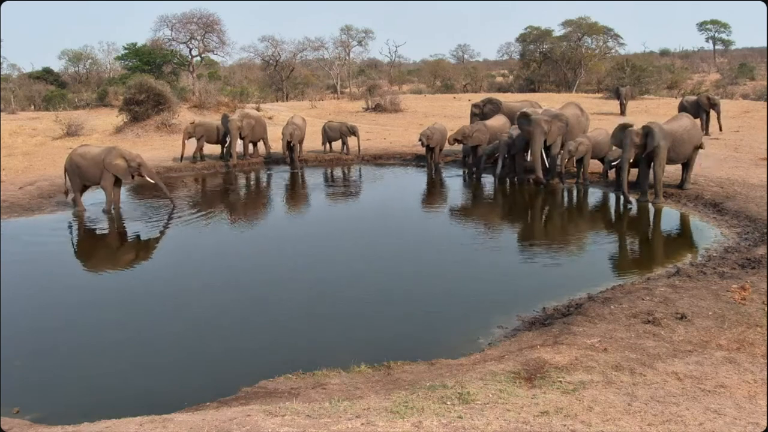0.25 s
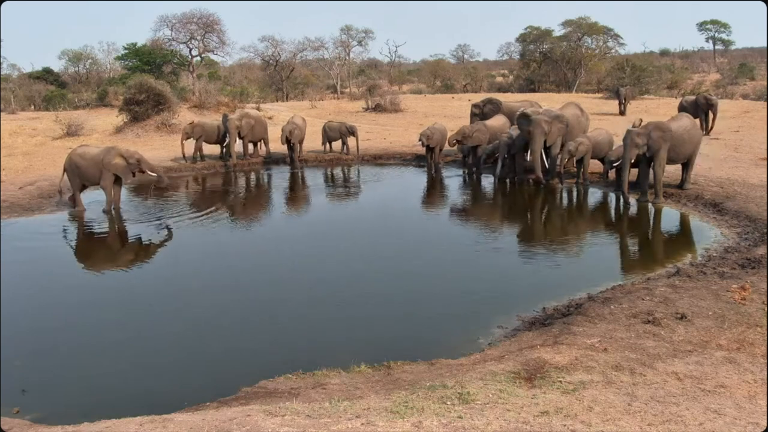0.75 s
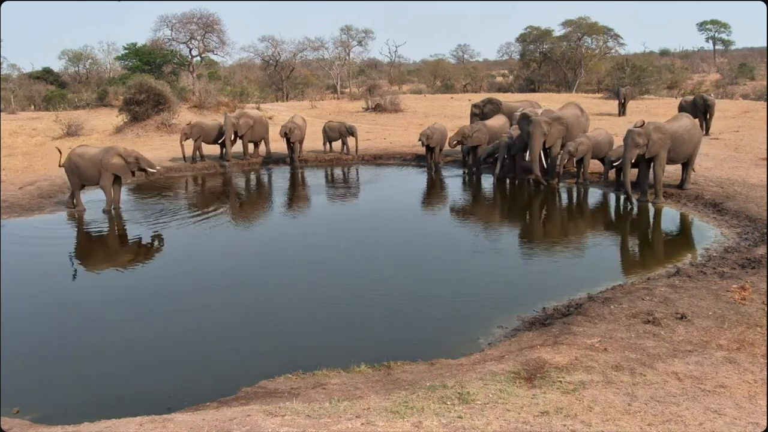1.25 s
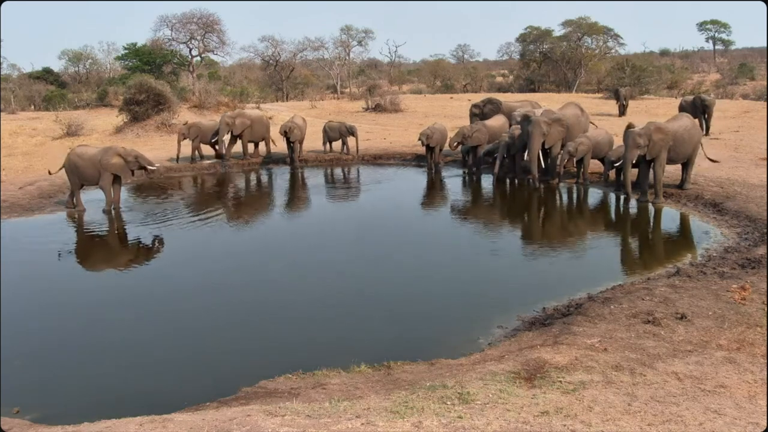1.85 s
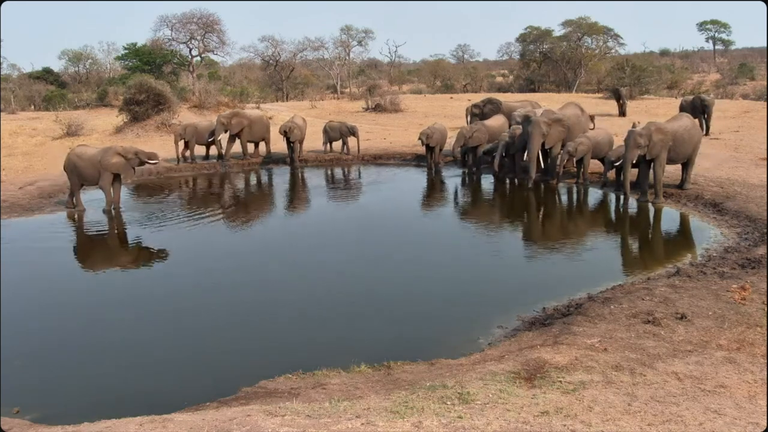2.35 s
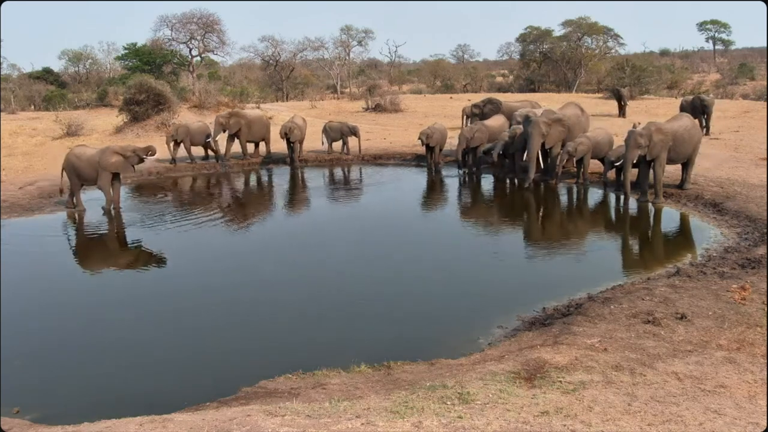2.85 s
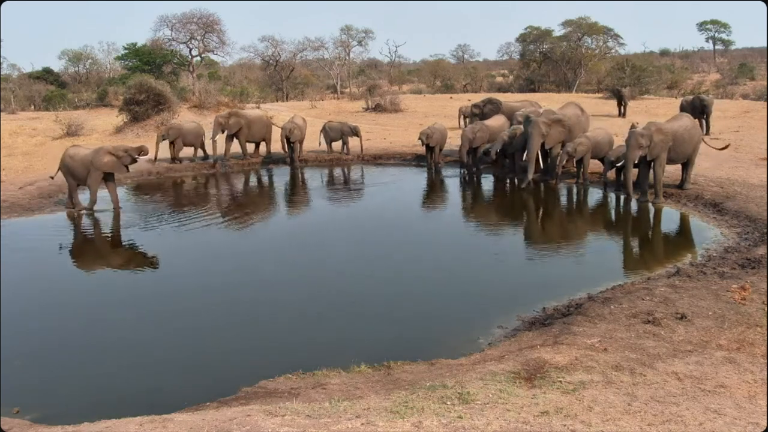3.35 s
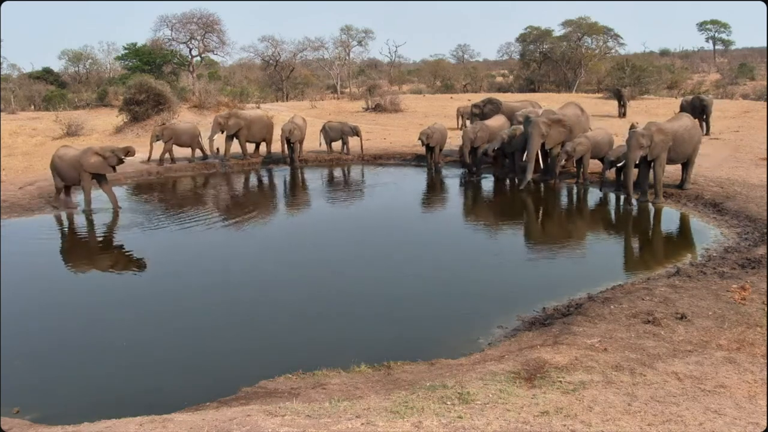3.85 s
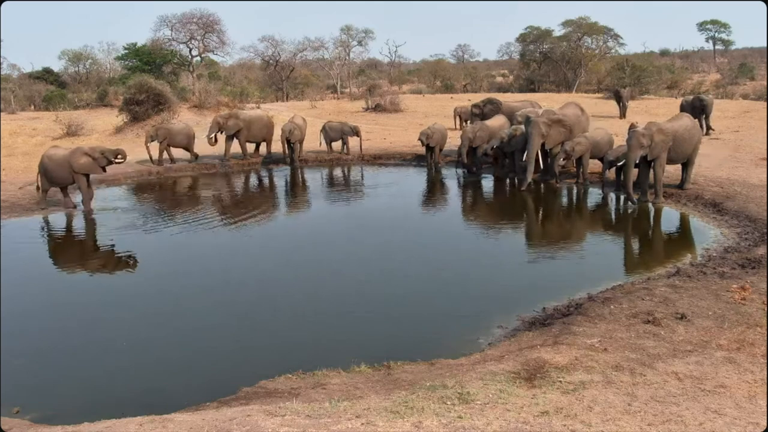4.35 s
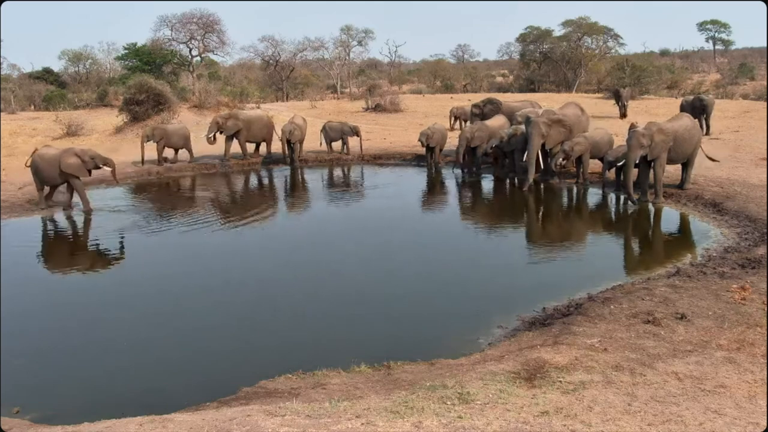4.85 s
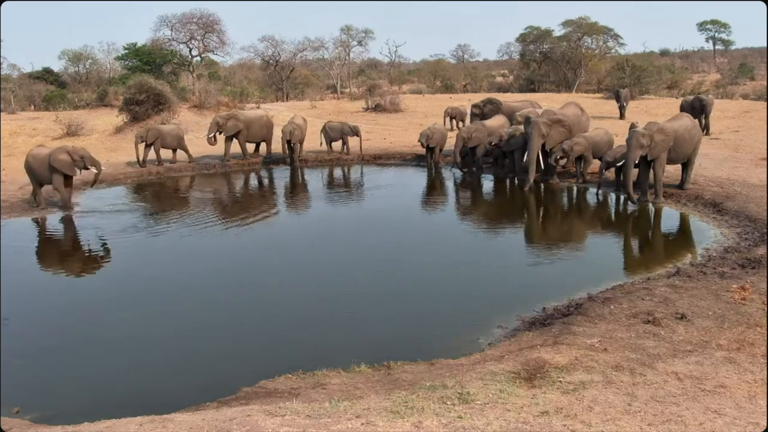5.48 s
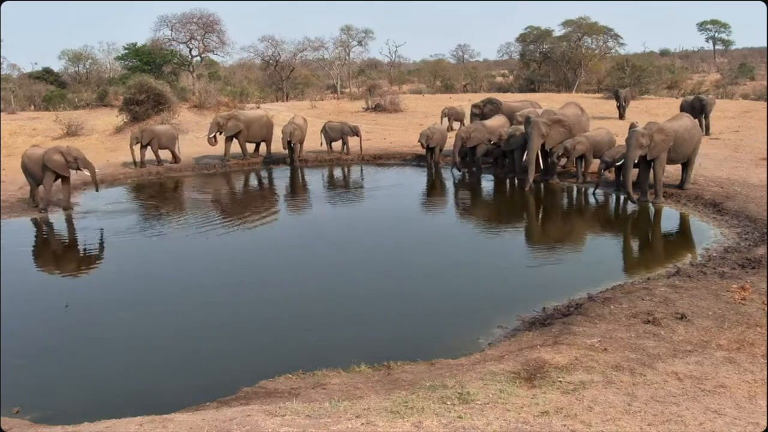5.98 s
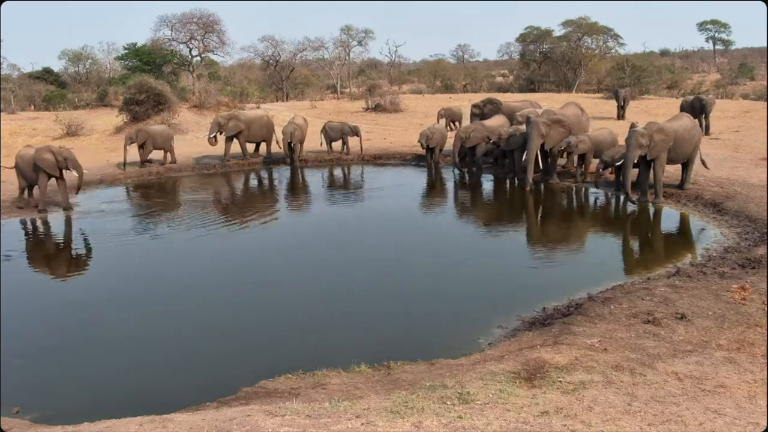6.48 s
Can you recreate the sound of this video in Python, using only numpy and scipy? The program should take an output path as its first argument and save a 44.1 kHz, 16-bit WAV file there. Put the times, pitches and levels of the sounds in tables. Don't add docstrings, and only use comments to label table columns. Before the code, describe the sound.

Light splashes and scattered glassy drops open over a soft trickle, with bubbles plopping in a stirred pool. A thicker gush of trunk water peaks early, with a faint blown breath; a sharp splash and hollow gulps follow midway. Later a bird gives a clear descending four-note whistle as the dripping fades. Open air, dry close echoes off water and bank, small bright microphone with slight hiss.

```python
import sys
import numpy as np
from scipy import signal
from scipy.fft import rfft, irfft, next_fast_len
from scipy.io import wavfile
from scipy.ndimage import uniform_filter1d, map_coordinates

SR = 44100
rng = np.random.default_rng(int(sys.argv[2]) if len(sys.argv) > 2 else 0)


def elevation(decibels):
    levels = np.asarray(decibels, float)
    return 10 ** (levels / 20)


def persist_wave(psi):
    counts = np.round(np.clip(psi, -1, 1) * 32767).astype(np.int16)
    wavfile.write(sys.argv[1], SR, np.atleast_2d(counts).T)


N = 296352

# hz, gain_db
HISS_TONE = [(15, -72), (25, -14), (147, -20.5), (301, -26), (781, -26), (1100, -22.5), (1560, -6.5),
             (1870, -19), (2380, -16.5), (2860, -14.5), (3440, -10.5), (8240, -20.5), (12900, -16),
             (14000, -29)]
# hz, level_db
MAINS_HUM = [
    (50, -86.5),
    (150.5, -85),
]
# start_s, flow_db
POUR = [(0, -55), (1.14, -57.5), (1.55, -45.5), (1.86, -52.5), (1.95, -44.5), (2.04, -44), (2.15, -39),
        (2.3, -38), (2.45, -44), (2.62, -55.5), (2.79, -57.5), (3.8, -57.5), (4.7, -59), (5.13, -56),
        (5.46, -57.5), (5.93, -66), (6.4, -68.5), (6.72, -60)]
# peak_s, spray_db, rise_20db_s, fall_20db_s, brightness_db
SPLASHES = [(0, -41, .1, 0.56, -1), (.6, -53, 0.1, 0.4, 3), (.92, -50, 0.2, .35, -1),
            (2.132, -47, 0, 0.03, 7), (2.866, -41, 0.07, 0.36, 4), (2.94, -38.5, 0.3, 0.23, -11),
            (3.83, -35, 0.0268, 0.2952, -1), (3.9, -41.5, 0.04, 0.26, -2.5), (4.13, -50, .25, 0.4, -7),
            (5.15, -58.5, 0.27, .5, 7), (1.66, -51.5, 0.1, 0.34, 2), (3.45, -61, 0.8, 0, 6),
            (5.6, -52.5, 0.26, .25, -5.5), (5.95, -67, -0.1, .4, 7), (6.27, -59.5, 0.15, .2, -12)]
# hz, gain_db
SPRAY_TONE = [(1060, -30), (1800, -16.5), (2280, -15.5), (2870, -11), (3290, -5.5), (3410, -2.5),
              (5270, -19), (5960, -25), (6500, -61.5), (8450, -31.5), (14300, -120)]
# hz, gain_db
FIZZ_TONE = [(3240, -32.5), (5500, 25), (5970, -2), (9730, -17.5), (12800, -26), (14000, -24.5)]
# hz, gain_db
JET_TONE = [(2500, -39.5), (3150, -2), (3450, -2.5), (3800, -12.5), (4500, -39)]
# start_s, level_db
LAPPING = [(0, -61.5), (2.6, -66.5), (4.8, -70), (5.3, -75), (6.2, -72), (6.72, -70)]
# peak_s, slosh_db, rise_20db_s, fall_20db_s, bubble_hz
STIRS = [(0, -56, .1, 0.5, 1200), (.24, -57.5, .2, 0.15, 794), (.79, -49, 0.52, 0.15, 721),
         (1.0, -59, .2, .5, 760), (1.41, -56, 0.76, 1.0, 1000), (1.96, -46, 0.1, .5, 1257),
         (2.11, -45, 0.07, 0.5, 926), (2.36, -45, 0.64, 0.4, 1000), (2.88, -55, .05, 0.35, 803),
         (2.97, -56, 0.26, 0.28, 1104), (3.41, -53, 0.32, 0.25, 827), (3.5, -54.5, 0.01, 0.2, 697),
         (3.72, -56, -0.1, .2, 900), (3.83, -42.5, 0.16, 0.43, 821), (3.96, -44, 0.34, 0.17, 725),
         (4.18, -56, .2, -2, 900), (4.382, -45.5, 0.06, .5, 780), (4.57, -58, 0.75, 0.43, 777),
         (4.67, -57.5, 0.4, .12, 800), (4.92, -54, -0.05, 0.39, 1148), (5.52, -55, .06, 0.41, 950),
         (5.63, -55, .25, 0.26, 1090), (6.3, -60.5, 0.26, 0.55, 1000), (6.56, -62.5, .05, 0.3, 960)]
# hz, gain_db
SLOSH_TONE = [(120, -75), (200, -27.5), (604, -7.5), (990, -10), (1080, -12.5), (1310, -6.5), (1490, -6),
              (2170, -15.5), (2600, -12), (3380, -40), (5720, -120)]
# start_s, peak_db, pitch_hz
GULPS = [(.03, -36, 1640), (1.2, -34, 2270), (.592, -31.5, 992), (.781, -36, 438), (.903, -42, 1760),
         (.905, -36, 2450), (.92, -33, 2600), (1.155, -36.5, 1610), (1.222, -38.5, 1570),
         (1.312, -35.5, 1690), (1.992, -37, 1155), (2.264, -30, 900), (3.122, -40.5, 1560),
         (3.632, -37.5, 1650), (3.799, -33, 1294), (3.841, -32, 970), (3.948, -32, 661),
         (4.04, -35.5, 1730), (4.382, -31, 529), (4.428, -21.5, 1288), (4.484, -35.5, 895),
         (6.565, -44.5, 844), (5.313, -39.5, 1500), (5.515, -45, 1440), (5.894, -43, 1370),
         (6.372, -39, 1380)]
# start_s, peak_db
SNAPS = [(0.0408, -36), (0.0623, -38), (0.1835, -39), (0.2922, -41), (0.5846, -41), (0.742, -36),
         (0.7692, -30), (0.8434, -33), (0.9033, -52), (1.4671, -46), (1.516, -42.5), (1.6601, -46),
         (1.7509, -40), (1.9764, -53), (2.1317, -24), (2.7985, -37), (2.826, -27), (2.8594, -26.5),
         (2.9602, -46), (3.1507, -41), (3.4535, -36), (3.4775, -34), (3.7818, -47), (3.8282, -36),
         (3.9735, -42), (4.0861, -41.5), (4.3276, -43), (4.792, -46), (5.0255, -34), (5.263, -36)]
# start_s, peak_db, pitch_hz, snap_db
DROPS = [(0.048, -28, 4200, -30), (0.107, -27, 4530, -9), (.184, -22.5, 3860, -15),
         (0.2941, -23.5, 4080, -11.5), (0.5778, -28, 4100, -15.5), (.742, -29, 4600, -11),
         (.769, -34, 4240, -3), (0.919, -34, 3240, -10.5), (1.26, -39, 5700, -19),
         (1.5167, -26, 3180, -13.5), (1.7525, -21, 3610, -20), (2.1232, -24, 4340, -14),
         (2.1316, -16, 3680, -12), (5.4705, -37, 4400, -11), (2.2884, -17.5, 3340, -33),
         (2.826, -25, 4170, -9), (2.8456, -23.5, 4340, -11), (2.8595, -17, 4280, -11),
         (2.9613, -22, 4040, -20), (3.1508, -36.5, 5060, -3), (3.387, -33, 4630, -9.5),
         (3.4772, -33, 4440, -9.5), (3.822, -18, 3740, -10.5), (3.8346, -13.5, 3640, -13),
         (3.8929, -16, 3770, -12), (3.919, -21.5, 3550, -12), (4.0977, -19.5, 3660, -14.5),
         (4.793, -37.5, 3520, -4.5), (5.315, -29.5, 3280, -15.5), (5.9614, -38.5, 3280, -11.5),
         (6.074, -40.5, 6000, -15.5), (6.2078, -36, 4900, -11)]
# start_s, peak_db, pitch_hz
DRIPS = [(0.138, -25, 3860), (.414, -31.5, 4570), (5.1516, -30, 5300), (0.536, -35, 4250),
         (0.6668, -32, 3620), (1.157, -34.5, 3560), (1.201, -28.5, 3430), (1.2725, -31, 3930),
         (1.3328, -32, 3440), (1.5527, -25, 3290), (1.597, -26.5, 3470), (1.8445, -24, 3970),
         (1.9508, -26.5, 3120), (2.0384, -30, 3330), (2.1854, -26, 3380), (2.2573, -23, 3400),
         (2.4126, -26, 3280), (2.8783, -17.5, 3800), (3.0203, -26, 3700), (3.043, -27, 4000),
         (3.0874, -28, 3420), (4.0438, -28, 4740), (4.3287, -33.5, 3560), (4.659, -31.5, 4000),
         (4.669, -36, 3560), (5.0917, -32, 3600), (5.1907, -31, 3300), (5.4064, -35.5, 3730),
         (6.185, -38.5, 3130), (6.6527, -40, 4160),
         (0.25, -35.5, 3740), (0.2638, -33, 3590), (0.4986, -37, 3500), (0.8904, -37, 3490),
           (1.135, -36, 3800), (1.4671, -36, 3720), (1.4845, -31, 3260), (1.6496, -31.5, 3460),
           (1.9165, -35, 3380), (2.0158, -29, 3430), (2.2254, -21.5, 3300), (2.3274, -22.5, 3400),
           (2.3374, -23, 3330), (3.1604, -34, 4900), (3.2214, -38, 4570), (3.246, -38, 3310),
           (3.274, -34.5, 3650), (3.3594, -40, 3910), (3.849, -20, 3510), (3.858, -21, 3770),
           (3.8812, -18, 3550), (3.9014, -21, 3740), (4.4228, -36.5, 3560), (4.8958, -35.5, 3300),
           (4.9317, -39, 3300), (5.0379, -34, 3540), (5.438, -39, 4700), (5.6166, -42, 3460),
           (5.7488, -43, 3330), (5.8591, -43, 3400), (5.9844, -41, 3470), (6.2605, -41, 3150),
           (6.3444, -47, 3470), (6.4208, -49, 3300), (6.5665, -46, 3500)]
# delay_s, level_db
BANK_ECHOES = [(.0027, -6.5), (.0065, -9.5), (0.012, -12.5), (.021, -15.5)]
# start_s, peak_db, pitch_hz, life_cycles
PLOPS = [(0.117, -40.5, 1530, 8), (0.267, -41, 1710, 10), (0.36, -46, 2290, 8.8), (0.481, -43, 1720, 8.6),
         (0.688, -45.5, 1420, 7.4), (0.703, -41.5, 867, 8), (0.98, -45, 743, 7.5), (1.313, -38.5, 1680, 8),
         (1.572, -38.5, 1540, 7.3), (1.6, -34, 666, 8), (1.667, -35, 676, 8), (1.822, -45.5, 802, 8),
         (1.864, -47, 790, 8), (1.995, -32, 1910, 8), (2.157, -22.5, 940, 10.4), (2.717, -48, 1520, 8),
         (3.034, -43, 1860, 8), (3.087, -49, 1140, 8), (3.349, -44, 1520, 8.7), (3.504, -38.5, 1490, 9.5),
         (3.863, -34, 950, 7.6), (4.332, -47, 1520, 8), (4.372, -35, 623, 8), (4.431, -26.5, 1280, 8),
         (4.454, -33, 1330, 7.3), (4.524, -41, 850, 8), (4.549, -45, 466, 8), (4.591, -43.5, 930, 8.9),
         (4.616, -44, 1220, 8), (4.629, -43, 640, 8), (4.843, -41, 1700, 9), (4.887, -41, 1480, 8),
         (4.93, -41, 1050, 8), (4.97, -42, 1580, 8), (5.002, -42, 1280, 9.2), (5.052, -45, 1580, 8),
         (5.133, -50, 1590, 7.2), (5.252, -46, 1580, 9.3), (5.502, -40, 1480, 8), (5.596, -42, 1480, 8),
         (5.859, -54, 848, 9.1), (5.932, -52.5, 1570, 8.9), (5.962, -46, 1700, 8), (6.119, -54, 1450, 8),
         (6.164, -49, 1050, 8), (6.254, -49, 1690, 8), (6.28, -47, 1430, 7.3), (6.324, -48, 1420, 8),
         (6.453, -47, 1450, 9.8), (6.545, -45.5, 1170, 8.5)]
# start_s, peak_db, starting_hz
RISERS = [(.425, -51, 451), (.562, -52, 1550), (.625, -47, 1230), (.748, -57, 1450), (0.816, -50.5, 940),
          (.93, -61, 420), (1.098, -56, 455), (4.125, -51, 408), (4.685, -62, 455), (5.415, -63.5, 548),
          (5.722, -54.5, 765), (6.268, -61, 608), (6.318, -56, 1000), (6.686, -56.5, 1050),
          (6.396, -58.5, 627)]
# start_s, length_s, pitch_hz, level_db
HOLLOWS = [(1.13, 0.17, 620, -66.5), (1.52, 0.15, 640, -59), (1.81, 0.076, 700, -64),
           (1.935, 0.065, 632, -49.5), (2.09, 0.16, 630, -50), (2.09, 0.073, 915, -43.5),
           (2.15, 0.062, 895, -43), (2.165, 0.043, 285, -56), (2.295, .1, 278, -57),
           (2.88, 0.086, 560, -59), (3.12, 0.042, 620, -58), (2.45, .05, 280, -63), (.765, 0.054, 420, -46),
           (.76, 0.065, 900, -56.5), (4.46, .17, 480, -63), (4.41, .07, 1300, -50.5),
           (6.33, 0.063, 1450, -60), (6.35, .07, 710, -66)]
# start_s, peak_db
SLAPS = [
    (0.769, -69),
    (2.13, -53.5),
    (3.829, -65),
    (3.908, -59),
]
# start_s, level_db
BLOW = [
    (1.93, -86),
    (2.14, -64),
    (2.185, -53),
    (2.25, -68),
    (2.335, -56.5),
    (2.41, -66.5),
    (2.47, -67),
    (2.53, -87),
]
# hz, width_hz, level_db
TRUNK_MODES = [
    (294, 21, -4),
    (672, 13, -7),
    (900, 80, -2),
    (1170, 81, -4),
]
# start_s, starting_hz, level_db, hold_s, swell_db over the hold
NOTES = [
    (3.7, 3380, -57, 0.054, -4),
    (3.835, 3070, -49, .027, 3),
    (3.936, 3040, -52, 0.039, -2),
    (4.07, 2850, -60, .022, -4),
    (5.116, 3390, -32, .034, 4.5),
    (5.242, 3120, -28, .023, -11.5),
    (5.349, 2996, -43, 0.023, 4.5),
    (5.463, 2960, -56, .024, 6),
]


def unit(x):
    return x / np.sqrt(np.mean(x ** 2) + 1e-20)


def curves(rows, **ends):
    s, *cols = np.transpose(rows)
    return [np.interp(np.arange(N) / SR, s, c, **ends) for c in cols]


def wobble(rate_hz):
    knots = rng.standard_normal(int(N * rate_hz / SR) + 4)
    return map_coordinates(knots, [np.arange(N) * rate_hz / SR])


def filtered(x, response):
    size = next_fast_len(N + SR // 2)
    return irfft(rfft(x, size) * response(np.fft.rfftfreq(size, 1 / SR)), size)[:N]


def coloured(x, spectrum):
    f, db = np.transpose(spectrum)
    hz = np.fft.rfftfreq(8192, 1 / SR)
    gain_db = np.interp(np.log(hz + 1), np.log(f + 1), db)
    cepstrum = irfft(np.log(elevation(np.clip(gain_db, -70, 0))))
    cepstrum[1:4096] *= 2
    cepstrum[4097:] = 0
    return unit(signal.fftconvolve(x, irfft(np.exp(rfft(cepstrum))))[:N])


def spatter(share, size_db, clump_db, hiss):
    clumps = elevation(clump_db * (wobble(20) + wobble(70)))
    size = elevation(size_db * np.minimum(rng.exponential(size=N), 4))
    hits = (rng.random(N) < share * clumps) * np.sign(rng.standard_normal(N)) * size
    return unit(hits) + hiss * rng.standard_normal(N)


def bubbles(s, db, hz, cycles, rise, attack, size):
    k = np.arange(size)
    cycles = np.maximum(cycles, 1)[:, None]
    age = k / SR * hz[:, None] / cycles
    swell = elevation(-26 * age) * (1 - np.exp(-(age / attack) ** 2))
    swell *= np.hanning(2 * size)[size:] ** .5 / swell.max(axis=1, keepdims=True)
    wave = elevation(db[:, None]) * swell * np.sin(2 * np.pi * cycles * (age + rise * age ** 2 / 2))
    at = np.round(s * SR).astype(int)[:, None] + k
    return np.bincount(at.ravel(), wave.ravel(), N + SR)[:N]


def crowd(count, centre_hz, spread, cycles, rise, attack, size_db, size):
    s, strength, life = rng.random((count, 3)).T
    scatter = np.exp(spread * np.clip(rng.standard_normal(count), -2, 2))
    hz = centre_hz[(s * (N - 1)).astype(int)] * scatter
    level_db = -size_db * np.log(strength + 0.029) + 10 * np.log10(hz)
    return unit(bubbles(s * N / SR, level_db, hz, cycles * (.5 + life), rise, attack, size))


def swells(rows, base_db, base_value):
    s, db, rise, fall, value = np.transpose(rows)[:, :, None]
    t = np.arange(0, N, 32) / SR
    before = (s - t) / np.maximum(rise, .01)
    after = (t - s) / np.maximum(fall, .02)
    power = elevation(2 * (db - 20 * np.where(t < s, before, after)))
    power, mix = (np.interp(np.arange(N) / SR, t, p.sum(axis=0)) for p in (power, power * value))
    total = power + elevation(2 * base_db)
    return 10 * np.log10(total), (mix + elevation(2 * base_db) * base_value) / total


def patchy(depth_db, top_hz):
    hz, _, z = signal.stft(rng.standard_normal(N), SR, nperseg=512)
    field = uniform_filter1d(rng.standard_normal(z.shape), size=5, axis=0)
    field = np.clip(unit(uniform_filter1d(field, size=9, axis=1)), -2, 1)
    hz = hz[:, None]
    gain_db = depth_db * field * (hz > 300) / (1 + (hz / top_hz) ** 2)
    return signal.istft(z * elevation(gain_db), SR, nperseg=512)[1][:N]


def floor():
    hiss = elevation(-62.5 + 0.85 * wobble(8.1)) * coloured(patchy(depth_db=8.5, top_hz=5140), HISS_TONE)
    murmur_tone = [(28, -27), (50, 2), (80, 4), (150, -4.5), (330, 9), (500, -9.5), (900, -63)]  # Hz, dB
    murmur = elevation(-79.5 + 1.3 * wobble(4.8)) * coloured(rng.standard_normal(N), murmur_tone)
    t = np.arange(N) / SR
    hum = sum(elevation(db + 1.5 + 0.42 * wobble(1.9)) * np.sin(2 * np.pi * hz * t) for hz, db in MAINS_HUM)
    return hiss + murmur + hum


def falling_water():
    trickle_db, trickle_bright_db = -56, -3.5
    dulling = 0.51
    flow_db, = curves(POUR)
    treble = elevation(2 * (trickle_bright_db - dulling * np.maximum(flow_db - trickle_db, 0)))
    splashes = [(*row[:4], elevation(2 * row[4])) for row in SPLASHES]
    level_db, share = swells(splashes, flow_db, treble)
    return level_db, 10 * np.log10(share)


def spray(level_db, bright_db):
    fizz = crowd(count=4000, centre_hz=np.full(N, 4200.), spread=0.295, cycles=13.5, rise=0.095,
                 attack=0.25, size_db=3.5, size=150)
    ticks = spatter(share=.03, size_db=4.0, clump_db=3.5, hiss=0.68)
    droplets = coloured(ticks, SPRAY_TONE) + 0.82 * coloured(fizz, SPRAY_TONE)
    droplets = elevation(2.13 * wobble(11)) * droplets
    fine = spatter(share=0.022, size_db=7.5, clump_db=6.0, hiss=0.63)
    thick = np.clip(-.07 * bright_db - .1, 0, .95)
    stream = rng.standard_normal(N) + 0.45 * ticks
    body = np.sqrt(1 - thick) * droplets + 0.93 * np.sqrt(thick) * coloured(stream, SPRAY_TONE)
    jet = elevation(-.8 * bright_db - 11) * coloured(stream, JET_TONE)
    treble = elevation(bright_db - 0.5) * coloured(0.71 * ticks + fine, FIZZ_TONE)
    return elevation(level_db - 1.62) * (body + jet + treble)


def slosh(level_db, bubble_hz):
    gurgle = crowd(count=2400, centre_hz=.85 * bubble_hz, spread=0.415, cycles=13.9, rise=0.41,
                   attack=0.35, size_db=4.5, size=900)
    wash = coloured(spatter(share=0.0082, size_db=2.0, clump_db=2, hiss=0.85), SLOSH_TONE)
    return elevation(level_db + 0.4 + 1.7 * wobble(24)) * unit(0.91 * gurgle + wash)


def gulps():
    s, db, hz = np.transpose(GULPS)
    return bubbles(s, db - 6.5, .96 * hz, 16.0 + 0 * s, rise=0.12, attack=0.17, size=3000)


def snaps():
    s, db = np.transpose(SNAPS)
    hz = 8600 * np.exp(0.09 * rng.standard_normal((len(s), 2)))
    return sum(bubbles(s + 0.00021, db - 8.5, f, 4.5 + 0 * s, rise=0.039, attack=0.19, size=60)
               for f in hz.T)


def drops():
    drip_snap_db = -27
    drips = [(*row, drip_snap_db) for row in DRIPS]
    s, db, hz, snap_db = np.transpose([*DROPS, *drips])
    s, same = s + .0003, np.ones_like(s)
    plink = bubbles(s, db - 1.0, hz, 8.95 * same, rise=0.033, attack=0.16, size=400)
    tick = bubbles(s, db + snap_db + 10.0, 5600 * same, 5.4 * same, rise=0.028, attack=0.09, size=60)
    snap = bubbles(s, db + snap_db - .5, 10500 * same, 1.54 * same, rise=0.051, attack=0.31, size=60)
    return plink + tick + snap


def echoes(x):
    return x + sum(elevation(db) * np.pad(x, (round(s * SR), 0))[:N] for s, db in BANK_ECHOES)


def plops():
    s, db, hz, cycles = np.transpose(PLOPS)
    parts = [(0.95, -2.5), (1.6, -16), (0.637, -18)]
    return sum(bubbles(s, db + part_db, ratio * hz, ratio * cycles, rise=0.21, attack=0.29, size=1500)
               for ratio, part_db in parts)


def risers():
    s, db, hz = np.transpose(RISERS)
    rise = np.minimum(1.3, 600 / hz[:, None])
    return bubbles(s, db + 1.5, hz, 30 + 0 * s, rise=rise, attack=0.22, size=1800)


def hollows():
    out, flutter, drift = np.zeros(N), wobble(70), wobble(45)
    for s, length, hz, db in HOLLOWS:
        at, n = round(s * SR), round(length * SR)
        phase = 2 * np.pi * hz * np.arange(n) / SR + 1.1 * drift[at:at + n] + at
        level = elevation(db + 1.5 + 4.34 * flutter[at:at + n]) * np.hanning(n) ** 0.5
        out[at:at + n] += level * np.sin(phase)
    return out


def slaps():
    s, db = np.transpose(SLAPS)
    return bubbles(s, db + 3.0, 110 + 0 * s, 1.5 + 0 * s, rise=-0.2, attack=0.13, size=2500)


def trunk():
    def tube(f):
        total = 0
        for k, (centre, width, db) in enumerate(TRUNK_MODES):
            mode = 1j * f * width / (centre * centre - f * f + 1j * f * width)
            total = total + (-1) ** k * elevation(db) * mode
        return total

    level_db, = curves(BLOW, left=-140, right=-140)
    breath = rng.standard_normal(N) * elevation(1.3 * wobble(39.6))
    return elevation(level_db + 5.5) * unit(filtered(breath, tube))


def bird():
    rest_hz, sag_s = 2146, 0.099
    attack_s, release_s = 0.0039, 0.0069
    out, flutter, t = np.zeros(N), wobble(110), np.arange(SR // 10) / SR
    for s, hz, db, hold, swell_db in NOTES:
        corners = np.cumsum([0, attack_s, hold, release_s, release_s])
        level_db = db + np.interp(t, corners, [-22, 0, swell_db, swell_db - 6.5, swell_db - 90])
        level = uniform_filter1d(elevation(level_db + 3), size=200)
        phase = 2 * np.pi * (rest_hz * t + (hz - rest_hz) * sag_s * (1 - np.exp(-t / sag_s)))
        tone = np.sin(phase) + .008 * np.sin(2 * phase)
        at = round(s * SR)
        out[at:][:len(t)] += level * elevation(0.19 * (-23.5 - db) * flutter[at:][:len(t)]) * tone
    bush = rng.standard_normal(len(t)) * elevation(-60 * t / .25) * np.minimum(t / 0.013, 1)
    return out + elevation(-18.5) * signal.fftconvolve(out, bush / np.linalg.norm(bush))[:N]


def scene():
    lapping_db, = curves(LAPPING)
    pool = slosh(*swells(STIRS, lapping_db, 1000))
    water = spray(*falling_water()) + pool + echoes(drops() + gulps()) + plops() + risers() + snaps()
    water = filtered(water, lambda hz: (1j * hz / (170 + 1j * hz)) ** 3)
    return (water + slaps() + trunk() + hollows() + bird() + floor())[None]


def low_pass(x):
    return signal.sosfilt(signal.butter(12, 14260, fs=SR, output="sos"), x)


def record(dry):
    top_hz = 13870
    mix = filtered(dry[0], lambda hz: hz < top_hz)[None]
    return low_pass(mix)


dry = scene()
out = record(dry)
persist_wave(out)
```